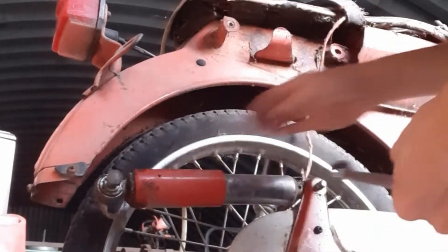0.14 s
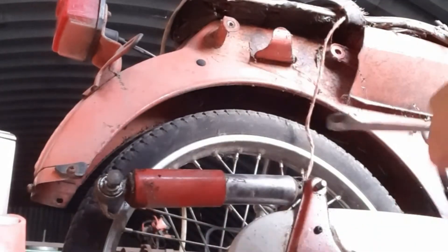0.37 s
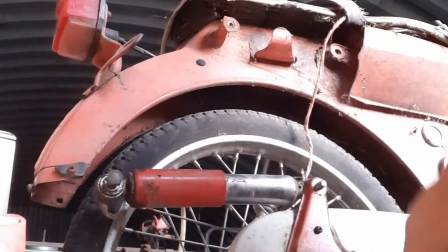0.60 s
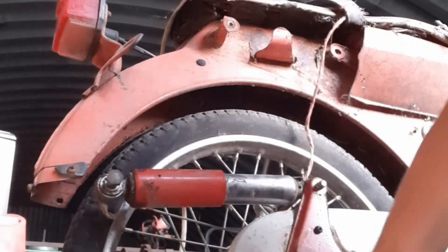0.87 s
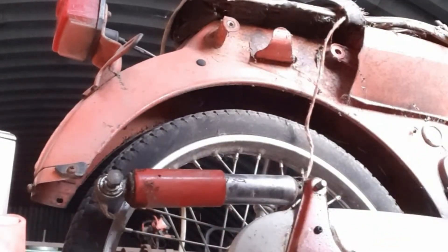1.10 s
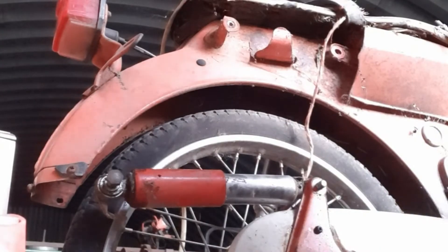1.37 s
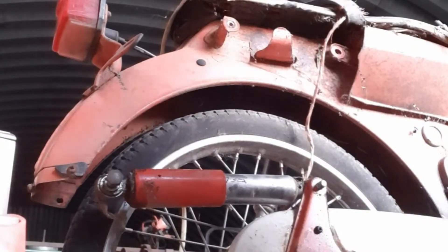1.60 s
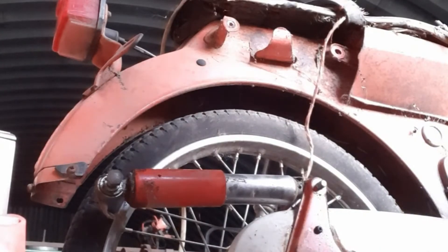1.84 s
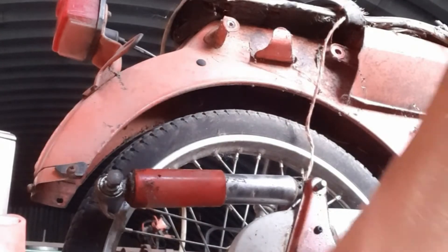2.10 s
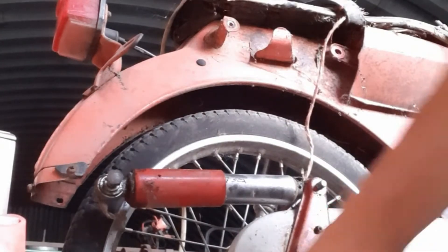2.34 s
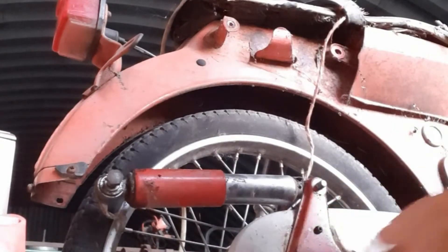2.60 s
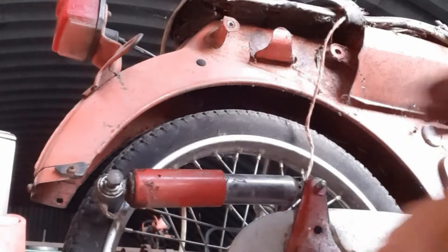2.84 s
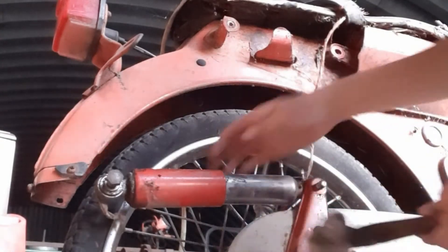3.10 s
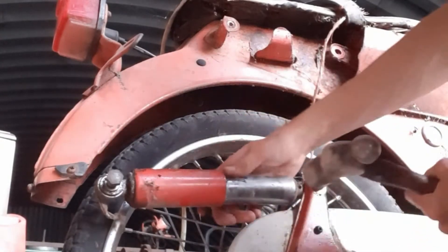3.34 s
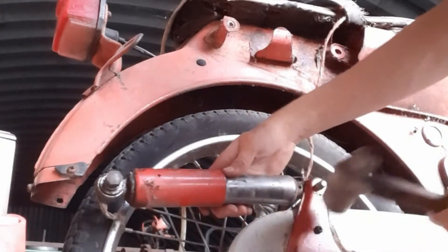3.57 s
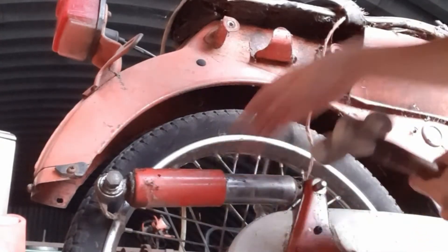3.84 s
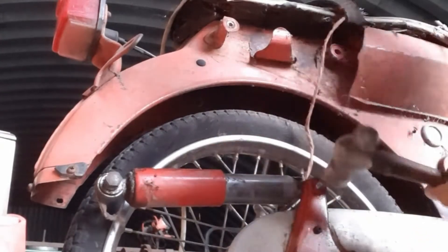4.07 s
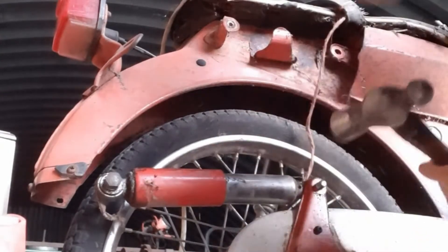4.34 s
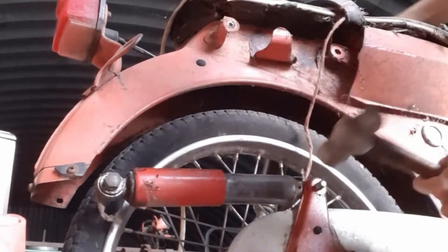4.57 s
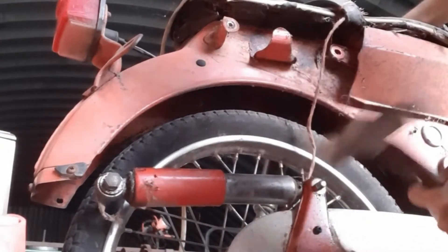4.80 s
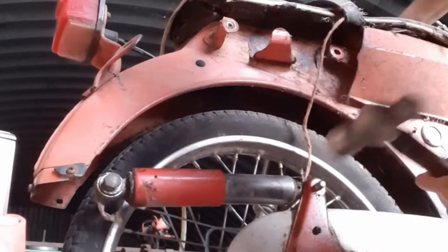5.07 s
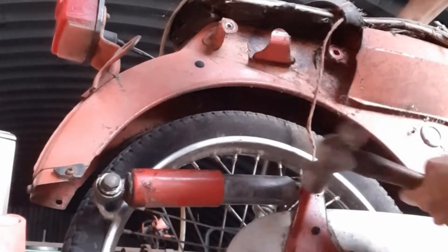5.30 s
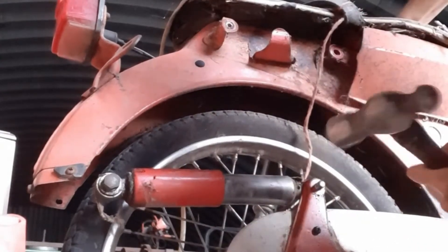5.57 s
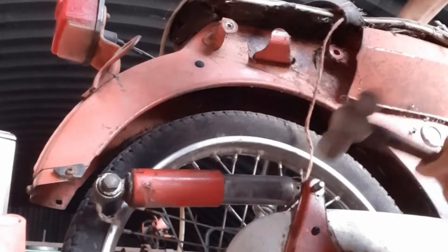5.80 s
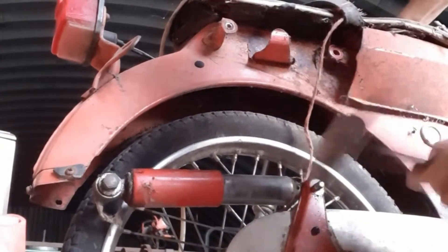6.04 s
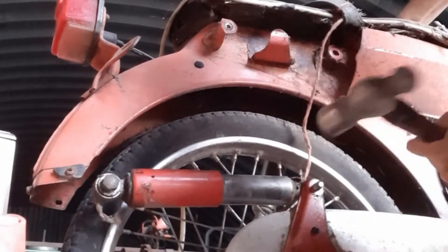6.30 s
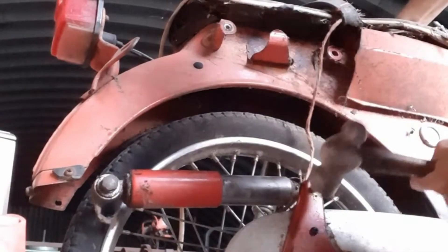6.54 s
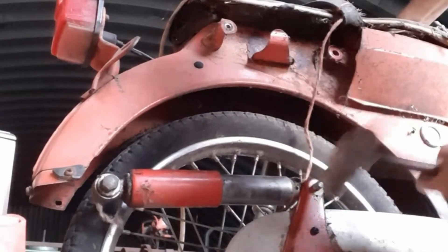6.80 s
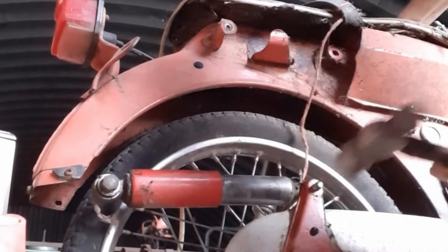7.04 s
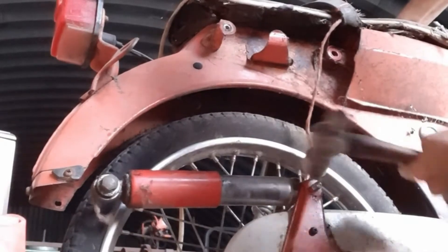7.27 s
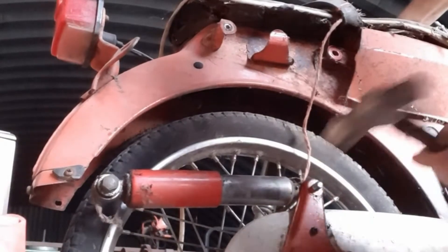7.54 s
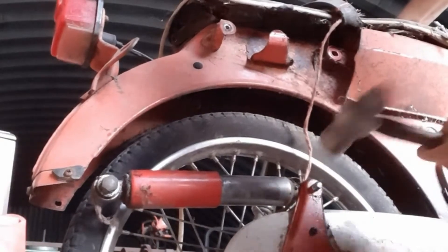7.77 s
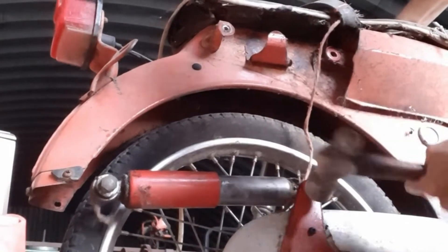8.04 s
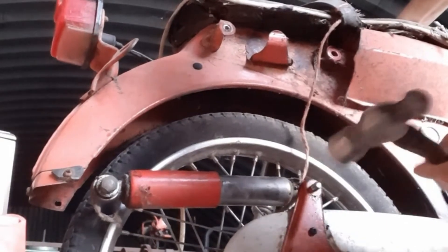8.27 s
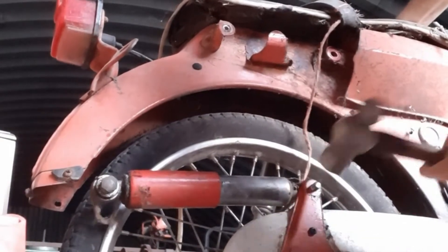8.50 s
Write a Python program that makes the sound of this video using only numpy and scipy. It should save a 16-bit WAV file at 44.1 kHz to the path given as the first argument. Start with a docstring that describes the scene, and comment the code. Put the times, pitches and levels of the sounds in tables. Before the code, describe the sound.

A quiet bare workshop with soft air hiss, slight clothing rustle and a faint distant cricket. A tool is set down with a quick cluster of dull knocks. After a pause, a hammer hits a motorcycle frame: two drier first blows, then a regular run of loud, hard clangs with a ringing metallic tail. Close stereo microphone, with the treble leaning left.

```python
"""Hammer on a steel frame

A hammer strikes a steel motorcycle frame fourteen times in a bare workshop: sine clang, noise-band ring,
frame mode clusters, floor thump. A tool is put down first with three dull knocks, damped sines plus scuff
noise; a fourth knock falls between blows. Clothes and shoes rustle as swelling filtered noise,
a cricket chirps far off as throbbing narrow noise, and still air is a steady coloured hiss.
"""
import sys
import numpy as np
from scipy import signal
from scipy.fft import rfft, irfft
from scipy.io import wavfile
from scipy.ndimage import uniform_filter1d

SR = 44100
rng = np.random.default_rng(int(sys.argv[2]) if len(sys.argv) > 2 else 0)


def master_out(mix):
    """Clip the mix to full scale and print it as 16-bit PCM to the path in sys.argv[1]."""
    frames = np.transpose(np.atleast_2d(mix))
    ceiling = np.clip(frames, -1, 1)
    pcm = np.round(ceiling * 32767).astype(np.int16)
    wavfile.write(sys.argv[1], SR, pcm)


def volts_from_decibels(level):
    """Turn decibel levels (scalar or array-like) into linear amplitude factors."""
    exponent = np.asarray(level, float) / 20
    return 10 ** exponent


N = 381024

# hammer blows: t/s, relative level/dB, thump level/dB, tilt at 8 kHz/dB
BLOWS = [(3.2117, -17.5, -53, -7), (3.5493, -8.5, -44, -5.5), (4.0802, -10.5, -17, -1),
         (4.5125, -8, -16, -3), (4.9235, -7.5, -19.5, -3), (5.3413, -8, -19.5, -1), (5.7332, -7, -22.5, -3),
         (6.1309, -5.5, -22.5, -4), (6.5203, -7, -20, -2), (6.8946, -7.5, -30, -2),
         (7.2896, -6.5, -26, -3.5), (7.6751, -7.5, -24, -2), (8.0495, -7, -25, -2.5),
         (8.4199, -6.5, -25.5, -4.5)]
MOUNT_BLOWS = 2   # the first blows land on the damper mount, the rest on the frame lug
# clusters of close modes in tubes and panels: f/Hz, width/Hz, t60 at the lug/s,
# relative level at the mount/dB, at the lug/dB
FRAME_MODES = [(134, 5.8, 2.1, -13.5, -2), (208.7, 55, 1.02, -5.5, -4), (356, 17, 1.14, -2.5, -3),
               (394, 46, 0.73, 5.5, 5), (436, 28, 0.18, 16.5, -29), (500, 53, 0.81, -10, -1.5),
               (575, 40, 0.5, -14, 1), (617, 52, 1.02, 4, -2), (696, 38, 0.44, 4, 1),
               (840, 12, 1.4, -18, -12.5), (956, 53, 0.87, -23.5, -2.5), (1020, 19, 1.1, -8, -11.5),
               (1103, 12.5, 0.86, -3, 0), (1210, 8.3, 1.1, -20, -4), (1510, 24, 0.98, -5, -16),
               (1797, 8.4, 1.27, -11, -11), (1990, 14.6, 0.89, -10, -7.5), (2071, 49, 1.12, -14.5, -5.5),
               (2270, 23, 0.77, -16, -9), (2275, 18, 0.39, -14, -21.5), (3170, 17, 0.38, -19, -2.5),
               (3580, 104, 0.61, -15, -12), (4280, 100, 0.74, -21, -10), (4590, 51, 0.76, -34, -11.5),
               (6100, 86, 0.17, -14, -27), (6290, 76, 0.77, -33, -20.5)]
# dense ring of sheet parts and walls: f/Hz, t60 at the lug/s, rise/s, crack over ring at the lug/dB,
# crack t60 at the lug/s
RING_BANDS = [(69, 1, 0.026, -3, 0.042), (173, 1, 0.0023, 21, 0.073), (432, 1, 0.0083, 11, 0.25),
              (783, 0.98, 0.0058, 10, 0.14), (1190, 1, 0.0028, 13, 0.14), (2130, 0.72, 0.0018, 13.5, 0.064),
              (3270, 0.84, 0.00027, 12, 0.069), (5900, 0.69, 0.00036, 11.5, 0.027),
              (9440, 0.56, 0.0008, -5, 0.017), (15130, 0.55, .0005, 10.5, 0.054)]
# ring spectrum, struck at the lug: f/Hz, level per Hz/dB
LUG_COLOUR = [(35, -49), (60, -9), (192, -8), (266, -14), (377, -1), (454, -12.5), (547, -1.5), (758, -8.5),
              (956, -10), (2660, -15), (4440, -17), (7410, -20.5), (8720, -26), (11500, -28),
              (15600, -26.5)]
# ring spectrum, struck at the mount: f/Hz, level per Hz/dB
MOUNT_COLOUR = [(35, -47), (60, -16), (130, -13.5), (285, -14), (377, -7), (476, -6.5), (522, 0.5),
                (776, -5.5), (1070, -10), (2010, -12), (7410, -24.5), (8930, -28), (12000, -29.5),
                (15600, -27.5)]
# short clang of hammer head and struck part: f/Hz, t60/s, relative level at the mount/dB, at the lug/dB
CLANG_MODES = [(210, 0.12, -20.0, -16.5), (397.7, 0.27, -5, -5), (569.5, 0.12, 7, -12), (685, 0.13, 0, -23),
               (962, 0.085, -0.5, -3.5), (1083, 0.04, 1, 0.5), (1400, 0.047, 3, -20), (2014, 0.047, 8, 1),
               (2193, 0.032, -8.5, 3.5), (2315, 0.032, 2, -2.5), (3260, 0.013, -13, -19.5),
               (3572, 0.034, -16, -5), (4430, 0.02, -13, 2), (4590, 0.016, -18, -9),
               (6270, 0.024, -23, -8.5), (11670, 0.01, -28, -6), (13800, .015, -21, -7)]
# wall echo of the crack: f/Hz, level re crack/dB
WALL_ECHO = [(1000, -15), (5000, -14), (12000, -3.5)]
# stereo balance of the hammer: f/Hz, left over right/dB
HAMMER_SIDE = [(60, 3.0), (500, -2.5), (1000, -3.5), (2000, -4), (4500, -3), (8000, -16.0), (13000, -3.5)]
# dull knocks: t/s, relative level/dB, f/Hz, time to peak/s, scuff level/dB, tool ring level/dB
KNOCKS = [(1.189, -29.5, 234, 0.0024, -54.5, -62.5), (1.252, -11.5, 183, 0.0024, -47, -49.5),
          (1.2908, -20.5, 214, 0.0029, -42.5, -48), (4.791, -22.5, 640, 0.0034, -48, -80)]
# modes of the tool: f/Hz, relative level/dB, t60/s
TOOL_MODES = [(782, 0, 0.26), (1567, -4.5, 0.46), (1750, -15.5, 0.24), (6380, -15.5, 0.17),
              (9125, -16.5, 0.21), (11160, -17, 0.17), (12400, -13.5, 0.19), (14860, -6, .2)]
# small clicks: t/s, relative level/dB, spectral corner f/Hz
TICKS = [(0.401, -53, 1510), (0.9035, -63, 1500), (2.066, -59, 400), (2.205, -61, 3500),
         (2.7694, -66, 3030), (5.241, -44, 3500), (5.306, -41, 9000), (5.327, -47, 11000)]
# rustle spectrum: f/Hz, level per Hz/dB
RUSTLE_COLOUR = [(470, -80), (800, -11), (1340, -12.5), (2700, -5), (3430, -8.5), (5480, -7.5), (8760, -31),
                 (14700, -3), (15700, -8.5), (16500, -45)]
# resonances of the scuffing: f/Hz, width/Hz, added power/dB
SCRAPES = [(2820, 150, 7), (3400, 230, 6), (4230, 440, 10.5)]
# movements of cloth and shoes: peak t/s, length scale/s, hiss level/dB, scuff level/dB
MOVES = [(0.09, 0.078, -62.5, -62.5), (0.63, 0.035, -82, -91), (0.83, .08, -87, -84), (1.73, .2, -89, -75),
         (2.04, .1, -66, -70), (2.2, 0.11, -79, -68), (2.56, 0.082, -73.5, -77), (2.68, 0.087, -68, -68),
         (2.77, 0.042, -85, -72), (3.17, 0.046, -78, -78), (3.38, 0.13, -68, -76)]
# faint ring near 2 kHz: peak t/s, length scale/s, level/dB
FAINT_RINGS = [(0.09, 0.17, -72), (0.32, .25, -78), (1.02, .25, -81), (1.74, .2, -79), (2.15, 0.2, -72.5),
               (2.63, 0.15, -68), (2.77, 0.092, -75)]
# low rub: peak t/s, length scale/s, level/dB
RUBS = [(0.2, 0.34, -76), (0.83, .06, -86), (1.72, 0.21, -81.5), (2.07, 0.06, -84), (2.27, 0.055, -80),
        (2.56, .07, -84), (3.17, 0.055, -83)]
# squeaks in the scuffing: peak t/s, length scale/s, level/dB, f/Hz
SQUEAKS = [(0.098, .06, -62, 2660), (2.67, .05, -68, 3200), (2.76, 0.033, -68, 3100)]
# cricket chirps: t/s, relative level/dB, length/s
CHIRPS = [(0.274, -72, 0.046), (0.682, -55.5, 0.13), (1.085, -76, 0.029), (1.51, -55, 0.13),
          (2.01, -68, 0.023), (2.32, -54, 0.12), (2.811, -72, 0.039), (3.152, -54, 0.14),
          (4.043, -55, 0.18)]
# spectrum of the still air: f/Hz, relative level per Hz/dB
AIR_COLOUR = [(15, -15.5), (25, -13.5), (80, 5.5), (726, -21.5), (1730, -16.5), (2040, -18), (2460, -27),
              (3150, -16.5), (4600, -4.5), (6380, -25.5), (7510, -21.5), (8600, -47), (11600, -48),
              (14800, -29), (16500, -41)]
# left-right correlation of noise: f/Hz, correlation
LIKENESS = [(60, 1), (180, 1), (550, 0.72), (1650, 0), (4970, 0.31), (15000, 0.016)]
# stereo balance of the two ports: f/Hz, left over right/dB
PORTS = [(60, -2.5), (110, 3), (200, 1.5), (380, 3), (700, 2.5), (1290, 3.5), (2380, 5.5), (4400, 11),
         (8120, 34), (15000, 11)]


def rms_one(x):
    """Scale to rms 1."""
    return x / np.sqrt(np.mean(x ** 2) + 1e-20)


def at_hz(points, hz):
    """Interpolate a table on a log-frequency axis."""
    points = np.array(points)
    return np.interp(np.log(hz + 1), np.log(points[:, 0] + 1), points[:, 1])


def colour(x, curve_db):
    """Causal minimum-phase filter from a dB function of Hz, by folding the cepstrum."""
    size = 8192
    cepstrum = irfft(curve_db(np.fft.rfftfreq(size, 1 / SR)) * np.log(10) / 20)
    cepstrum[1:size // 2] *= 2
    cepstrum[size // 2 + 1:] = 0
    impulse = irfft(np.exp(rfft(cepstrum)))
    return signal.oaconvolve(np.atleast_2d(x), [impulse], axes=1)[:, :np.shape(x)[-1]]


def stereo_noise(size):
    """Frequencies and spectra of a left-right noise pair, alike in the bass, unrelated in the treble."""
    hz = np.fft.rfftfreq(size, 1 / SR)
    mid, side = rfft(rng.standard_normal((2, size)))
    alike = np.clip(at_hz(LIKENESS, hz), -1, 1)
    pair = np.sqrt(1 + alike) * mid + np.sqrt(1 - alike) * side * [[1], [-1]]
    return hz, pair / np.sqrt(2)


def narrow(hz, width_hz):
    """Stereo noise in one steep resonance, rms 1."""
    f, noise = stereo_noise(N)
    return rms_one(irfft(noise / (1 + (2 * (f - hz) / width_hz) ** 4), N))


def dying(t, t60_s):
    """Exponential decay, 60 dB in t60_s, silent before time 0."""
    return volts_from_decibels(-60 * np.maximum(t, 0) / t60_s) * (t >= 0)


def bump(t, peak_s):
    """Soft push: swells to 1 at peak_s and fades."""
    return (t / peak_s) ** 2 * np.exp(2 - 2 * t / peak_s)


def swells(rows, column=2):
    """Sum of envelopes that rise to a peak and sink a little more slowly; column holds the level."""
    t, total = np.arange(N) / SR, 0
    for row in rows:
        x = (t - row[0]) / row[1]
        steepness = np.where(x < 0, 1.9, 1.5)
        total = total + volts_from_decibels(row[column]) * np.exp(-np.abs(x * steepness) ** 1.8)
    return total


def add(out, sound, start_s):
    """Mix a sound in at a time."""
    i = round(start_s * SR)
    out[:, i:i + sound.shape[-1]] += sound[..., :N - i]


def hammer():
    """Each blow: dense ring, frame mode clusters, short clang, thump through the floor."""
    size = 40000
    t, out, dense = np.arange(size) / SR, np.zeros((2, N)), np.zeros((2, 2, N))
    alike, dense_db, left_lag_s = 0.48, 3.0, 0.00007
    hz, same = stereo_noise(size)   # shared by all blows: nearly the same spot is hit
    phases = rng.uniform(0, 2 * np.pi, (len(FRAME_MODES), 1, 1))
    phases = phases + rng.normal(0, 0.62, (len(FRAME_MODES), 2, 1))
    for n, (start_s, db, thump_db, bright_db) in enumerate(BLOWS):
        spot = int(n >= MOUNT_BLOWS)   # 0 mount, 1 lug
        ring_share = 1 if spot else 0.81   # the mount rings shorter than the lug
        body_db = -16.5 + (0.33 - 1) * db   # the body follows only a third of the blow's strength
        # blows that reach the floor also ring deeper
        bass_db = 0.34 * np.clip(thump_db + 20, -7, 7)
        tilt = [(150, body_db + bass_db), (330, body_db), (500, body_db), (2000, 0.0031), (8000, bright_db)]
        noise = np.sqrt(alike) * same + np.sqrt(1 - alike) * stereo_noise(size)[1]
        add(dense[spot], volts_from_decibels(db) * dense_ring(t, hz, noise, tilt, spot, ring_share), start_s)
        add(out, volts_from_decibels(db) * frame_clusters(t, hz, noise, tilt, spot, ring_share, phases), start_s)
        clang(out, t[:size // 3], start_s, db, spot)
        add(out, floor_thump(t, thump_db), start_s)
    for ring, spectrum in zip(dense, (MOUNT_COLOUR, LUG_COLOUR)):
        out = out + volts_from_decibels(dense_db) * colour(ring, lambda hz: at_hz(spectrum, hz))
    out[0] = np.roll(out[0], round(left_lag_s * SR))
    left = colour(out[0], lambda hz: at_hz(HAMMER_SIDE, hz) / 2)[0]
    right = colour(out[1], lambda hz: -at_hz(HAMMER_SIDE, hz) / 2)[0]
    return np.array([left, right])


def dense_ring(t, hz, noise, tilt, spot, ring_share):
    """Unresolved modes of sheet parts and walls: noise bands, each with a crack, wall echo and slow decay."""
    # the damped mount gives up more of its sound early
    early_db, stretch = (0, 1) if spot else (6.5, 0.74)
    echo_s, total = 0.026, 0
    for k, (centre, t60, rise, crack_db, crack_t60) in enumerate(RING_BANDS):
        band_power = at_hz([(row[0], j == k) for j, row in enumerate(RING_BANDS)], hz)
        crack = dying(t, crack_t60 * stretch)
        crack = crack + volts_from_decibels(at_hz(WALL_ECHO, centre)) * dying(t - echo_s, crack_t60 * stretch)
        decay = dying(t, ring_share * t60) + volts_from_decibels(crack_db + early_db) * crack
        shape = (1 - np.exp(-t / rise)) * decay
        total = total + volts_from_decibels(at_hz(tilt, centre)) * shape * irfft(noise * np.sqrt(band_power), len(t))
    return total


def frame_clusters(t, hz, noise, tilt, spot, ring_share, phases):
    """Close modes of tubes and panels: resonant noise around a sine, filling and dying."""
    core, modes_db, total = 0.55, 3.5, 0
    for (f, width, t60, *level_db), phase in zip(FRAME_MODES, phases):
        cluster = irfft(noise / (1 + (2 * (hz - f) / width) ** 2), len(t))
        # strongest mode of the cluster
        cluster += core * np.sqrt(np.pi * width / SR) * np.sin(2 * np.pi * f * t + phase)
        swell = 1 - np.exp(-t * f / 0.71)   # low modes take longer to fill
        gain = volts_from_decibels(modes_db + level_db[spot] + at_hz(tilt, f))
        total = total + gain * swell * dying(t, ring_share * t60) * cluster
    return total


def clang(out, t, start_s, db, spot):
    """Contact modes as damped sines of varying level; loose parts knock each once more, weaker the later."""
    clang_db, spread_db, delay_s = -8.5, 3, 0.0008
    rattle_db, rattle_from_s, rattle_span_s = -9.5, 0.012, 0.07
    for f, t60, *level_db in CLANG_MODES:
        gain = volts_from_decibels(db + clang_db + level_db[spot] + spread_db * rng.standard_normal())
        onset = 1 - np.exp(-t * f ** 2 / 1500)
        mode = gain * onset * dying(t, t60) * np.sin(2 * np.pi * f * t)
        late = rng.random()
        add(out, mode, start_s + delay_s)
        add(out, volts_from_decibels(rattle_db - 9.0 * late) * mode, start_s + rattle_from_s + rattle_span_s * late)


def floor_thump(t, thump_db):
    """Low sine push through the floor, weaker and phase-turned at the right port."""
    thump_hz, peak_s = 61.6, 0.0092
    turn_rad, side_db = np.array([[0], [0.4]]), np.array([[0], [-5]])
    return volts_from_decibels(thump_db + side_db) * bump(t, peak_s) * np.sin(2 * np.pi * thump_hz * t - turn_rad)


def knocks():
    """Soft low push with a scuff and a short boom of the floor; a steel tool rings faintly along."""
    t, out = np.arange(SR // 2) / SR, np.zeros((2, N))
    boom_db, fizz, low_cut_hz = -20.0, 0.0013, 73
    turn_rad = np.array([[0], [0.36]])
    tool_still_s = 1.375   # the tool lies flat and stops ringing
    low_cut = signal.butter(2, low_cut_hz, "high", fs=SR, output="sos")
    for start_s, db, hz, peak_s, scuff_db, tool_db in KNOCKS:
        push = bump(t, peak_s) * np.sin(2 * np.pi * hz * t - turn_rad)
        # a higher mode of the floor
        push = push + 0.16 * bump(t, 0.64 * peak_s) * np.sin(2 * np.pi * 2.53 * hz * t)
        push = signal.sosfilt(low_cut, push)
        f, noise = stereo_noise(len(t))
        scuff = rms_one(irfft(noise * (f / (1 + (f / 900) ** 3) + fizz * f), len(t)))
        scuff = volts_from_decibels(scuff_db) * (dying(t, 0.04) + 0.2 * dying(t, 0.34)) * scuff
        boom = rms_one(irfft(noise * f ** 2 / (1 + (f / (0.96 * hz)) ** 6), len(t)))
        boom = (1 - np.exp(-t / 0.0054)) * volts_from_decibels(boom_db) * dying(t, 0.37) * boom
        tool = sum(volts_from_decibels(tool_db + d) * dying(t, t60) * np.sin(2 * np.pi * m * t) for m, d, t60 in TOOL_MODES)
        tool = tool * (1 - 0.52 * np.cos(2 * np.pi * 12.7 * t))   # close mode pairs beat
        stilled = volts_from_decibels(-600 * np.maximum(start_s + t - tool_still_s, 0))
        add(out, volts_from_decibels(db) * (push + boom) + scuff + stilled * tool, start_s)
    return out


def ticks():
    """Small clicks: band-shaped noise with a fast decay."""
    t, out = np.arange(SR // 2) / SR, np.zeros((2, N))
    for start_s, db, hz in TICKS:
        f, noise = stereo_noise(len(t))
        click = rms_one(irfft(noise * f / (hz + f ** 3 / hz ** 2), len(t)))
        add(out, volts_from_decibels(db) * dying(t, 0.041) * click / 2, start_s)
    return out


def rustle():
    """Someone moves about: bright hiss, grainy scuffing, narrow ring, low rub and squeaks, all swelling noise."""
    still_hiss_db, still_scuff_db = -82, -87   # between movements
    hz, noise = stereo_noise(N)
    noise = noise * volts_from_decibels(at_hz(RUSTLE_COLOUR, hz))
    upper = 1 / (1 + (7500 / (hz + 1)) ** 8)
    scrapes = 1 + sum(volts_from_decibels(2 * db) / (1 + (2 * (hz - f) / width) ** 2) for f, width, db in SCRAPES)
    hiss = rms_one(irfft(noise * np.sqrt(upper), N))
    scuff = rms_one(irfft(noise * np.sqrt((1 - upper) * scrapes), N))
    grain = rms_one(uniform_filter1d(rng.standard_normal(N), size=300))
    scuff = scuff * volts_from_decibels(2.9 * grain)   # grainy friction
    out = (volts_from_decibels(still_hiss_db) + swells(MOVES)) * hiss
    out = out + (volts_from_decibels(still_scuff_db) + swells(MOVES, column=3)) * scuff
    out = out + swells(FAINT_RINGS) * narrow(2050, 200) + swells(RUBS) * narrow(594, 240)
    return out + sum(swells([row]) * narrow(row[3], 260) for row in SQUEAKS)


def cricket():
    """Wing pulses, blurred by the room: each chirp swells, throbs unevenly, widens downward and trails off."""
    centre_hz, width_hz, bend_hz = 4587, 240, 120
    pulses_per_s, pulse_jitter, tail_t60_s = 42, 0.248, 0.7
    t, shape, late = np.arange(N) / SR, 0, 0
    for start_s, db, length_s in CHIRPS:
        swell = np.clip((t - start_s) / (1.5 * length_s), 0, 1)
        tail = volts_from_decibels(-60 * np.maximum(t - start_s - length_s, 0) / tail_t60_s)
        chirp = volts_from_decibels(db) * np.sqrt(swell) * tail
        shape = shape + chirp
        late = late + chirp * np.clip((t - start_s) / length_s, 0, 1) ** 2
    wander = rms_one(uniform_filter1d(rng.standard_normal(N), size=600))
    pulse_count = np.cumsum(pulses_per_s * (1 + pulse_jitter * wander)) / SR
    throb = 0.9 + np.sin(np.pi * pulse_count) ** 2
    upper = narrow(centre_hz + bend_hz / 2, width_hz)
    lower = narrow(centre_hz - 1.8 * bend_hz, width_hz)
    return throb * (shape * upper + 0.28 * late * lower)


def still_air():
    """Steady coloured noise of the workshop air."""
    air_db = -70
    noise = irfft(stereo_noise(N)[1], N)
    return volts_from_decibels(air_db) * rms_one(colour(noise, lambda hz: at_hz(AIR_COLOUR, hz)))


def scene():
    """Hammer, small sounds and still air."""
    return hammer() + knocks() + ticks() + rustle() + cricket() + still_air()


def top_cut(x):
    """Nothing passes above the cut-off."""
    return signal.sosfilt(signal.butter(12, 16830, fs=SR, output="sos"), x)


def record(dry):
    """Two ports of unequal balance, each with a notch, a low cut and a top edge; peaks are rounded."""
    notch_hz, notch_width_hz, notch_db = 8750, 950, -11.0
    top_hz, top_db, low_cut_hz = 15860, -30.5, 42

    def port(hz, side):
        notch = notch_db / (1 + (2 * (hz - notch_hz) / notch_width_hz) ** 4)
        low_cut = -10 * np.log10(1 + (low_cut_hz / (hz + 4)) ** 4)
        top_edge = top_db / (1 + np.exp((top_hz - hz) / 60))
        return side * at_hz(PORTS, hz) / 2 + notch + top_edge + low_cut

    left = colour(dry[0], lambda hz: port(hz, 1))[0]
    right = colour(dry[1], lambda hz: port(hz, -1))[0]
    mix = 0.97 * np.tanh(np.array([left, right]) / 0.99)
    return top_cut(mix)


dry = scene()
out = record(dry)
master_out(out)
```